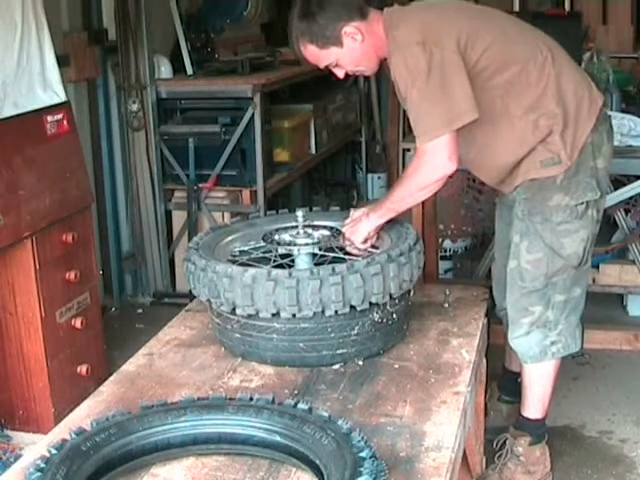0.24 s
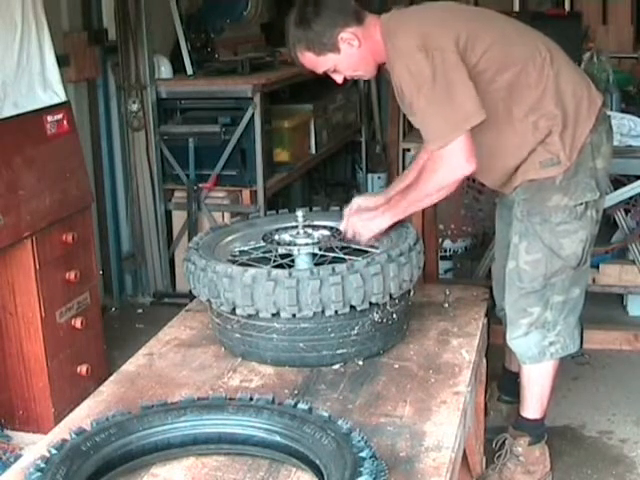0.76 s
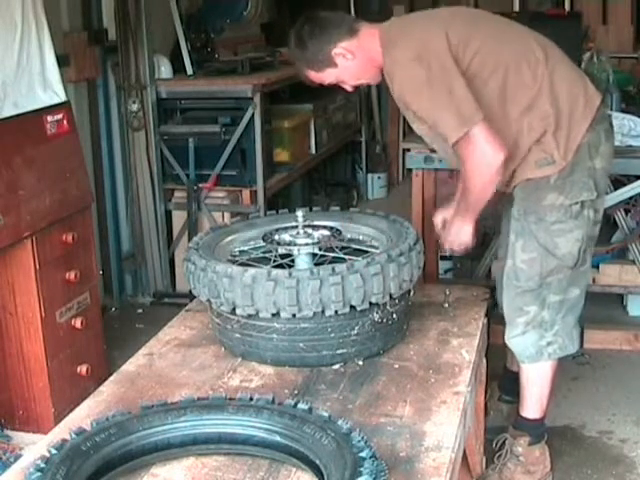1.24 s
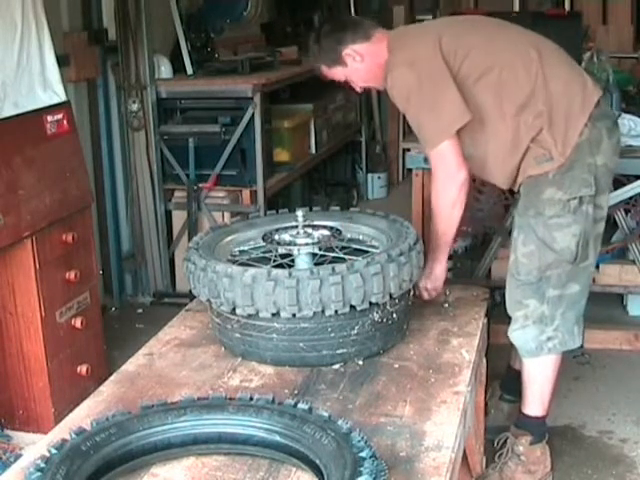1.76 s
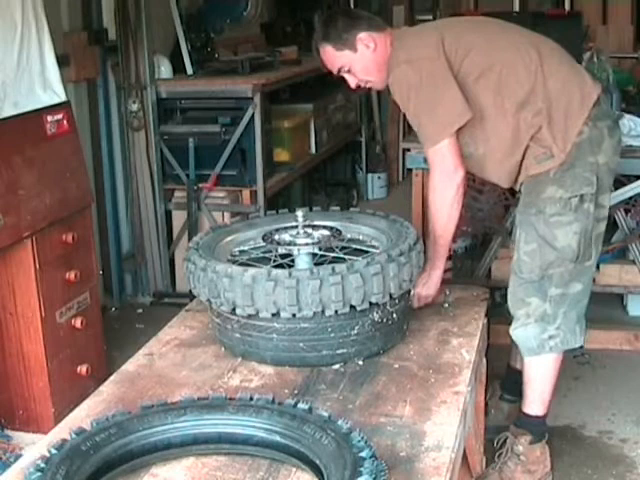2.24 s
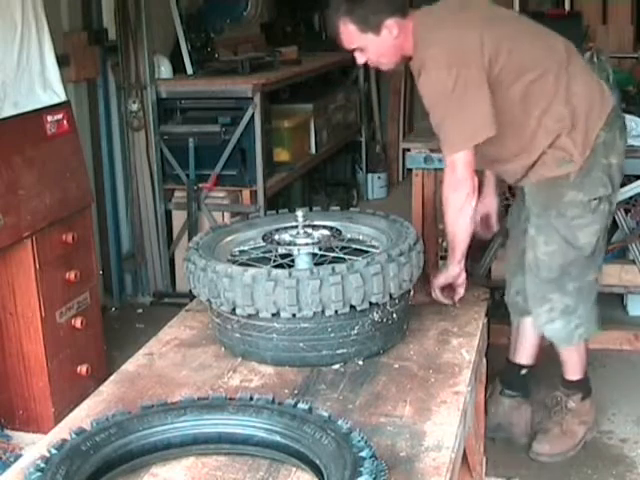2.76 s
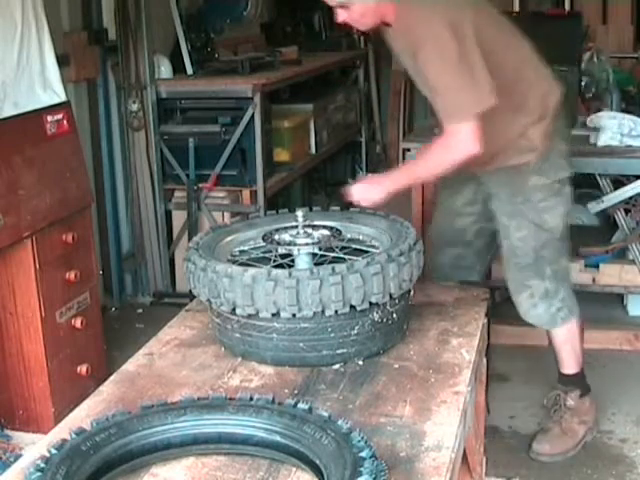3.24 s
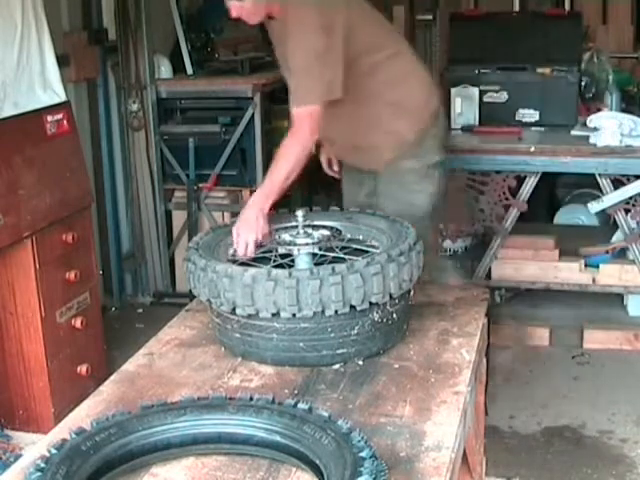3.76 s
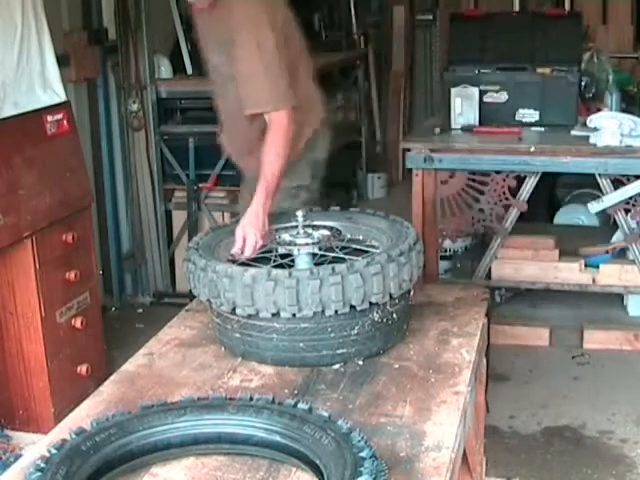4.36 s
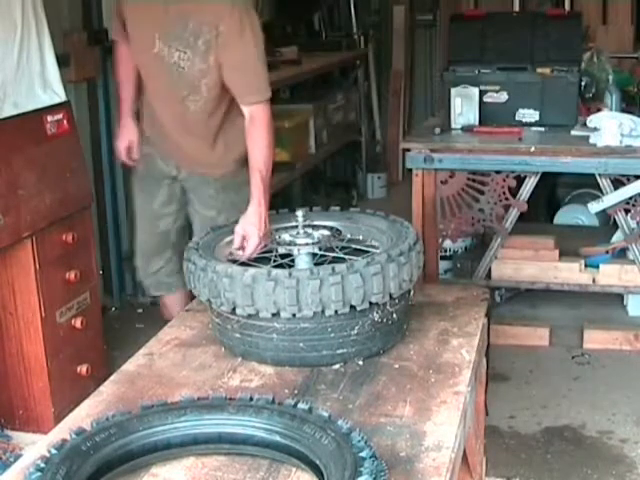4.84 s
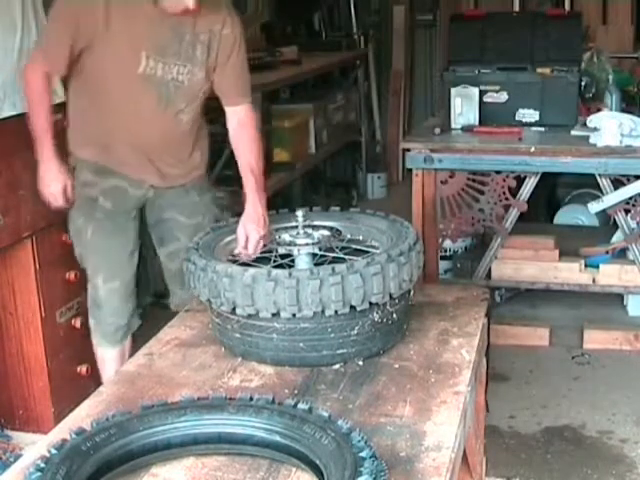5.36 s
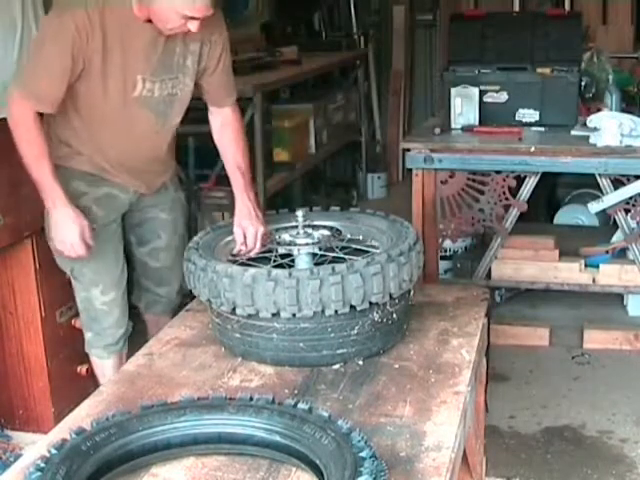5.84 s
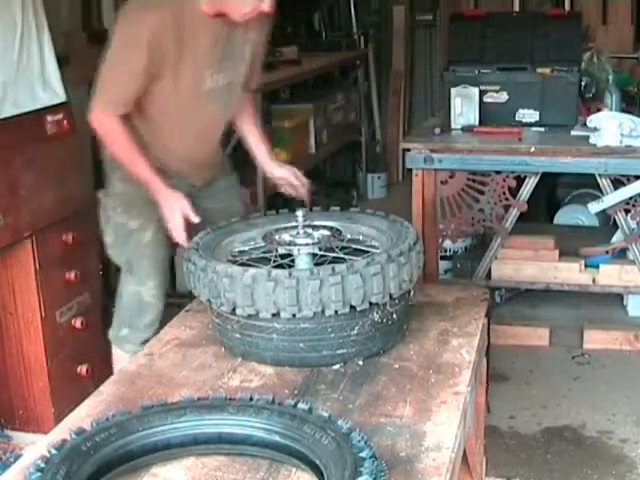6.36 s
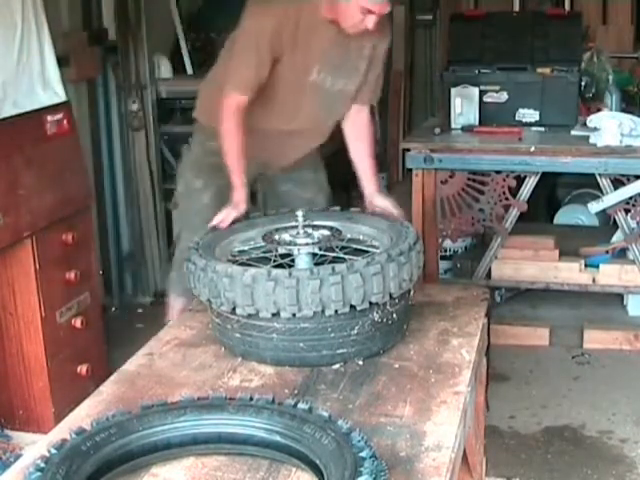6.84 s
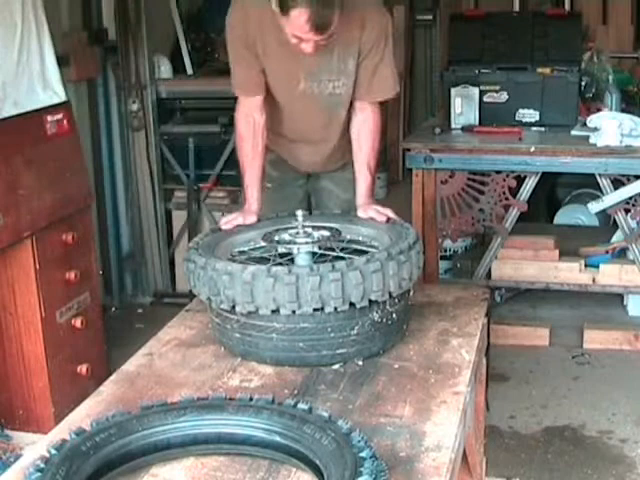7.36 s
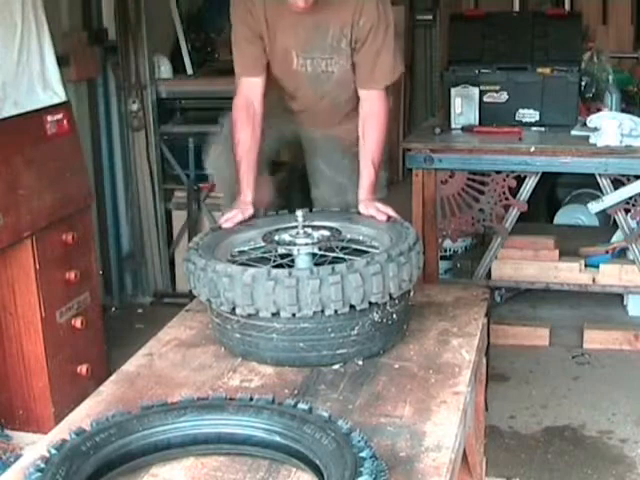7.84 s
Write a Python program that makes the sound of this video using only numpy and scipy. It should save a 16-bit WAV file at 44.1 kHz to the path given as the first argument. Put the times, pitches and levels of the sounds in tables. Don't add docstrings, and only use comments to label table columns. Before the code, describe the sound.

In an open workshop, a loosened tyre valve spits, then bursts into a strong bright hiss that slowly fades over several seconds. Early low wind thumps buffet the close stereo microphone. A small tool knocks on the wooden bench and boots scuff lightly. Near the end a steel tool clatters down loudly in rapid bounces, followed by a couple of dull thuds. Faint drive whine and ticking run underneath.

```python
import sys
import numpy as np
from scipy import signal
from scipy.fft import rfft, irfft, next_fast_len
from scipy.io import wavfile
from scipy.ndimage import uniform_filter1d

SR = 44100
rng = np.random.default_rng(int(sys.argv[2]) if len(sys.argv) > 2 else 0)


def linear_from_db(decibels):
    return 10 ** (np.asarray(decibels, float) / 20)


def materialize(psi):
    bounded = np.clip(np.atleast_2d(psi).T, -1, 1)
    quanta = np.round(bounded * 32767).astype(np.int16)
    wavfile.write(sys.argv[1], SR, quanta)


N = 356813


def evened(x):
    return x / np.sqrt(np.mean(x ** 2) + 1e-20)


def unit(shape):
    return shape / np.sqrt((shape ** 2).sum(0))


def read(points, hz):
    f, value = np.transpose(points)
    return np.interp(np.log(hz + 1), np.log(f + 1), value)


def add(mix, s, sound):
    part = mix[round(s * SR):][:len(sound)]
    part += sound[:len(part)]


def grid(size):
    return np.arange(N * 4 // size + 5) * size / 4 / SR, np.fft.rfftfreq(size, 1 / SR)[:, None]


def sine(hz, t):
    return np.sin(2 * np.pi * hz * t)


def onset(t, rise_s):
    return 1 - np.exp(-t / rise_s)


def decay(t, t60):
    return linear_from_db(-60 * t / t60)


def resonance(hz, centre_hz, width_hz):
    return 1 / (1 + ((hz - centre_hz) / width_hz) ** 2)


def swell(t, events, rise_db_per_s, fall_db_per_s):
    s, hold, db = np.transpose(events)[:, :, None]
    under_db = np.maximum(rise_db_per_s * (s - t), 0) + np.maximum(fall_db_per_s * (t - s - hold), 0)
    return np.sqrt((linear_from_db(db - under_db) ** 2).sum(0))


def noise(gain, same, patchy_db, flicker_db):
    bins, frames = gain.shape[-2:]
    a, b, c, d, patches = rng.standard_normal((frames, bins, 5), dtype=np.float32).T
    patches = evened(uniform_filter1d(uniform_filter1d(patches, size=9, axis=0), size=9, axis=1))
    flicker = evened(uniform_filter1d(rng.standard_normal(frames), size=4))
    same, left = np.clip(same, -1, 1), a + 1j * b
    right = same * left + np.sqrt(1 - same ** 2) * (c + 1j * d)
    z = np.array([left, right])
    z *= gain * linear_from_db(patchy_db * patches + flicker_db * flicker)
    ports = signal.istft(z, nperseg=2 * bins - 2, noverlap=3 * (bins - 1) // 2)[1]
    return ports[:, :N] / np.sqrt(3)


def coloured(points, length):
    spectrum = rfft(rng.standard_normal(length))
    return evened(irfft(spectrum * linear_from_db(read(points, np.fft.rfftfreq(length, 1 / SR))), length))


def ring(modes, tilt_db):
    hz, db, t60 = np.transpose(modes)[:, :, None]
    t, luck = np.arange(SR // 5) / SR, rng.standard_normal((len(modes), 3))
    spread_db, detune, slip = 2.2, .02, .4
    turns = hz * (1 + detune * luck[:, 2:]) * t
    level = linear_from_db(db + tilt_db + spread_db * luck[:, :1]) * decay(t, t60)
    tones = level * np.sin(2 * np.pi * turns + slip * luck[:, 1:2])
    return tones.sum(0) * onset(t, .0016) * np.minimum(20 * (t[-1] - t), 1)


def slow_gain_db(t, creep, back):
    turn_s, back_s = 7.9, 7.95
    rise_db = .85 * np.minimum(t, turn_s) + .5 * (t > turn_s)
    return creep * rise_db + back * 3.5 * np.maximum(t - back_s, 0)


def shop():
    # f/Hz, level/dB per Hz
    murmur = [(40, -51), (88, -7.5), (150, -7), (627, -8.5), (772, -8), (1380, -14.5), (3550, -22.5),
              (3750, -26), (5330, -17.5), (5900, -23.5), (8760, -23.5), (11200, -44), (13500, -60)]
    # f/Hz, likeness (0-1)
    likeness = [(200, 0.47), (1000, 0.56), (3000, 0.32), (4500, 0.42), (8000, 0.6)]
    # f/Hz, level/dB rms
    gears = [(5171, -64), (5238, -70), (5265, -55.5), (5394, -55.5), (5500, -71)]
    t, hz = grid(size=1024)
    gain = linear_from_db(-50.5 + slow_gain_db(t, .53, .27) + 9) * unit(linear_from_db(read(murmur, hz)))
    air = noise(gain, read(likeness, hz), patchy_db=2, flicker_db=.2)
    t = np.arange(N) / SR
    wow = .3 * evened(uniform_filter1d(rng.standard_normal(N), size=6000))
    whine = sum(linear_from_db(db + 3) * np.sin(2 * np.pi * (f * t + rng.random()) + wow) for f, db in gears)
    beat_hz, beat_db, beat_from_s, beat_rise_s = 5367, -62.5, 7, .9
    beat_db = beat_db + 11.5 * np.clip((t - beat_from_s) / beat_rise_s, 0, 1)
    beat = linear_from_db(beat_db + 2) * np.sin(2 * np.pi * beat_hz * t + wow)
    return air + linear_from_db(-2.5 + slow_gain_db(t, .24, 2.9)) * (whine + beat)


def wind():
    # t/s, hold/s, common level/dB, opposite level/dB
    gusts = np.array([(0.373, 0.02, -47, -33), (0.51, 0.014, -48, -33), (0.58, .01, -43, -48),
                      (0.641, 0.01, -36.5, -32), (0.703, 0.022, -45, -45), (0.778, 0.041, -34, -34),
                      (0.853, 0.022, -35, -31), (0.915, 0.022, -37, -38), (1.002, 0.017, -39, -39),
                      (1.07, .015, -49, -43), (1.14, 0.014, -45, -38), (1.195, 0.017, -40, -36),
                      (1.296, 0.013, -37.5, -41), (1.36, 0.0093, -50, -51), (1.474, 0.035, -41.5, -40),
                      (1.547, .015, -46, -41), (1.61, 0.02, -37.5, -36), (1.673, .02, -40.5, -36),
                      (1.76, 0.027, -43, -44), (1.86, 0.025, -53, -56), (1.98, 0.22, -48, -52.5),
                      (2.3, 0.22, -48, -52), (2.474, 0.033, -49, -44), (2.62, 0.15, -49.5, -68),
                      (2.97, 0.6, -60, -76), (4.047, 0.28, -70, -53), (4.45, 0.22, -70, -53),
                      (4.893, .05, -70.5, -46), (5.25, .1, -75.5, -48), (6.0, .07, -78, -53),
                      (6.13, .04, -80, -40), (6.38, .07, -70, -48), (6.665, .05, -70, -43)])
    # t/s, f/Hz, level/dB
    puffs = [(.39, 120, -44), (.525, 55, -41), (.645, 170, -32.5), (0.798, 200, -34), (.865, 116, -37),
             (1.031, 250, -43), (1.07, 95, -40), (1.145, 125, -35), (1.19, 160, -40), (1.22, 110, -38),
             (1.3, 190, -33), (1.319, 108.3, -41), (1.469, 120, -38), (1.509, 80, -35), (1.56, 160, -36),
             (1.63, 150, -38), (1.69, 100, -41)]
    # t/s, hold/s, level/dB
    passing = [
        (4.617, 0.087, -47),
        (5.1, 0.04, -41.5),
        (5.35, 0.054, -43),
        (5.62, 0.1, -51),
        (5.777, 0.36, -41.5),
        (6.3, .05, -48),
        (6.63, 0.027, -43),
        (7.445, 0.053, -42.5),
        (7.7, 0.22, -48.5),
    ]
    # f/Hz, level/dB per Hz
    common_colour = [(12, -57), (35, -16), (124, 4.5), (282, -6.5), (354, -12), (386, -17), (600, -43),
                     (780, -53), (1320, -120)]
    apart_colour = [(12, -46), (20, -17), (64, -7), (87, 0.5), (344, -13.5), (392, -18), (600, -38),
                    (780, -71), (1320, -120)]
    traffic_colour = [(18, -46), (30, -49), (81, -8.5), (212, -5), (368, -13.5), (461, -20), (600, -25),
                      (780, -47), (1320, -120)]
    t, hz = grid(size=1024)
    common, apart = (swell(t, gusts[:, [0, 1, k]], 448, 346) for k in (2, 3))
    traffic_from_s, breeze_from_s = 4.3, 4.6
    calm = linear_from_db(-59.5) * (t < traffic_from_s) * (t > gusts[0, 0])
    common = np.hypot(common, calm) * linear_from_db(3.5) * unit(linear_from_db(read(common_colour, hz)))
    traffic = np.hypot(swell(t, passing, 87, 60), linear_from_db(-54) * (t > traffic_from_s))
    rumble = traffic * linear_from_db(3.5) * unit(linear_from_db(read(traffic_colour, hz)))
    breeze = linear_from_db(np.minimum(-51 + 5 * (t - breeze_from_s), -42)) * (t > breeze_from_s)
    apart = np.hypot(apart, np.hypot(breeze, linear_from_db(-76)))
    apart = apart * linear_from_db(2.5) * unit(linear_from_db(read(apart_colour, hz)))
    mid, side = noise(np.array([np.hypot(common, rumble), apart]), 0, patchy_db=2.5, flicker_db=1.4)
    for s, puff_hz, db in puffs:
        turns = np.arange(-3 * SR // 100, 3 * SR // 100) / SR * puff_hz
        shape = np.hanning(len(turns)) * np.exp(-(turns / 1.06) ** 2)
        add(mid, s - .03, linear_from_db(db + 1.5) * shape * np.sin(2 * np.pi * (turns + rng.random())))
    return np.array([mid + side, mid - side])


def ticks():
    out, t = np.zeros(N), np.arange(400) / SR
    tick = sine(1200, t) * decay(t, .014) * onset(t, .00099)
    first_s, round_s, step_s = .172, .18, .04
    for start in np.arange(first_s, N / SR, round_s):
        for step in range(4):
            db = -41 + 9 - 1.6 * (step > 0) + 1.7 * rng.standard_normal()
            add(out, start + step * step_s, linear_from_db(db) * tick)
    body = linear_from_db(-65) * sine(6611, np.arange(N) / SR)
    out = out + body
    return np.array([out, -out]) + linear_from_db(-4) * body


def scuffs():
    # t/s, peak level/dB, ring f/Hz, grit relative level/dB, t60/s
    contacts = [(2.965, -31, 1470, 0, .15), (2.982, -27.5, 620, 5, 0.17), (2.997, -31, 1400, 2, .12),
                (3.051, -26.5, 1445, -0.5, 0.13), (3.402, -41, 2160, 6, 0.11),
                (4.048, -25, 1680, -8, 0.093), (4.091, -34, 1380, -10, 0.15), (5.739, -33, 298, -11, 0.075),
                (6.596, -40, 371, 1, 0.077), (6.638, -32, 300, -5, 0.48), (6.665, -13, 703, -10, 0.062),
                (6.774, -39, 480, -11, 0.15), (7.415, -26.5, 700, -22, 0.16),
                (7.449, -27.5, 1470, -7, 0.23), (7.482, -20, 745, -30, 0.12),
                (7.486, -16.5, 690, -20, 0.068)]
    # t/s, f/Hz, level/dB, t60/s
    taps = [(6.666, 2620, -30, .05), (7.097, 510, -21, .26), (7.14, 1590, -19, .22),
            (7.125, 3520, -36, .17), (7.13, 3680, -36, .18), (7.14, 3860, -36, .17), (7.15, 4050, -39, .15),
            (6.977, 3700, -30, .22), (6.835, 248, -21, .07), (6.838, 1120, -15, .06),
            (6.866, 1066, -17, .05), (6.877, 410, -21, .06), (7.008, 3680, -30, .12),
            (7.012, 1500, -22, .1), (6.929, 3750, -18, .04), (6.887, 3700, -20, .04),
            (7.13, 3310, -33, .18), (7.483, 2080, -21, .024), (7.487, 1100, -21, .03),
            (7.487, 1600, -23, .03), (7.485, 330, -27, .04)]
    thud_colour = [(45, -50), (100, -33), (300, -2), (1500, -5), (3000, -12.5), (5000, -24.5)]
    grit_colour = [(2500, -35), (4000, -4), (9000, 2), (13000, -20)]
    out, t = np.zeros(N), np.arange(SR // 4) / SR
    for s, db, hz, grit_db, t60 in contacts:
        thud = coloured(thud_colour, len(t))
        grit = coloured(grit_colour, len(t))
        tone = 1.65 * sine(hz, t) * decay(t, .037)
        rub = (thud + linear_from_db(grit_db) * grit) * decay(t, max(t60, .02))
        add(out, s, linear_from_db(db - 7) * onset(t, .0036) * (tone + rub))
    for s, hz, db, t60 in taps:
        add(out, s, ring([(hz, db, t60)], 0))
    return out


def knocks():
    # t/s, peak level/dB, sharpness relative level/dB
    contacts = [
        (2.272, -20.5, 3),
        (2.65, -25.5, 0),
        (2.704, -32, -6),
        (2.744, -48, 8),
        (2.75, -29, -3.5),
        (2.83, -29, -8),
        (2.882, -44, 6),
    ]
    # f/Hz, level/dB, t60/s
    bench = [(516, -3, .15), (550, -9, .07), (450, -18, .05), (600, -9, .05), (660, -8, .07),
             (950, -4, .045), (1080, -2, .045), (1220, -3, .045), (1380, -6, .05), (1500, -4, .06),
             (1750, -10, .09)]
    out, hz = np.zeros(N), np.transpose(bench)[0][:, None]
    for s, db, sharp_db in contacts:
        add(out, s, linear_from_db(db - 1) * ring(bench, sharp_db * (hz > 800)))
    return out


def clatter():
    # t/s, peak level/dB, hollow ring f/Hz, bright ring f/Hz, bright over hollow level/dB
    bounces = [(6.8318, -2, 750, 2300, -6), (6.8338, 4.5, 1055, 2300, -6), (6.8344, 5.5, 620, 1486, -1.5),
               (6.857, 4, 1060, 2820, 14), (6.8598, 1.5, 786, 1930, 10), (6.868, 0.5, 597, 1510, 0),
               (6.886, 2.5, 1970, 2956, 10), (6.899, -13, 940, 1640, 11), (6.9275, 1.5, 1040, 2290, 4),
               (6.931, 3, 696, 2370, 0), (6.948, -3.5, 840, 2280, 6), (6.971, 1.5, 650, 2300, -7),
               (6.995, -12, 525, 1500, 2), (7.034, -7, 1060, 2420, 5), (7.0375, -2, 640, 1500, -3),
               (7.047, -5.5, 1500, 2360, 7), (7.055, -0.5, 1000, 1475, 6), (7.076, -7, 790, 1570, 6),
               (7.0954, 1, 540, 1520, 6), (7.105, -5.5, 527, 2260, -1.5), (7.111, -9.5, 543, 1500, -12),
               (7.136, -4.5, 996, 1550, -6)]
    # f/Hz, level/dB, t60/s
    steel = [(286, -5, 0.1), (508, -3, 0.35), (604, -7, 0.068), (744, -13.5, 0.21), (996, -4, 0.24),
             (1125, 0, 0.22), (1460, -2, 0.082), (1620, -4, 0.23), (1680, -6, 0.46), (1760, -11, .12),
             (2020, -18, 0.16), (2330, -4, 0.11), (2500, -2, 0.13), (3250, 0, 0.075), (3450, -11, 0.32),
             (3520, -14, 0.32), (3690, -16, 0.18), (4200, -30, 0.099), (4070, -15, 0.21), (3810, -26, .2),
             (5000, -24, .3), (6360, -26.5, 0.9), (7350, -42, .5)]
    # t/s, level/dB, t60/s
    sprays = [(6.835, -26, .03), (6.861, -24, .025), (6.888, -21, 0.037), (6.929, -16, 0.035),
              (6.934, -21, 0.042), (6.944, -28, .15), (6.974, -31.5, 0.27), (7.036, -27, 0.043),
              (7.055, -27.5, .06), (7.0965, -22.5, .04), (7.107, -32, .08)]
    # f/Hz, level/dB per Hz
    crack_colour = [(88, -48), (150, -17.5), (270, -8.5), (382, -12.5), (638, -4.5), (1190, -9),
                    (2300, -12.5), (3700, -25), (6090, -39.5), (7180, -34.5), (12000, -52.5), (15600, -103),
                    (22000, -120)]
    spray_colour = [(2600, -28), (3500, 1.5), (5300, -3), (6500, -11), (8500, -27), (12000, -52)]
    buzz_colour = [(2900, -30), (3250, -5), (3700, 3), (4200, -4), (4800, -25)]
    out, hz, t = np.zeros(N), np.transpose(steel)[0][:, None], np.arange(SR // 3) / SR
    for s, db, hollow_hz, bright_hz, tilt_db in bounces:
        hollow_db, bright_db = -6 - max(tilt_db, 0), -6 + min(tilt_db, 0)
        tilted = [(f, d + .88 * tilt_db * (1500 < f < 3300)) for f, d in crack_colour]
        crack = coloured(tilted, len(t)) * onset(t, .0018)
        crack = crack * (decay(t, .032) + .096 * decay(t, .45))
        faces = linear_from_db(hollow_db) * sine(hollow_hz, t) + linear_from_db(bright_db) * sine(bright_hz, t)
        faces = faces * decay(t, .028) * onset(t, .0017)
        body = ring(steel, .63 * np.where(hz > 1300, bright_db, hollow_db))
        add(out, s, linear_from_db(db) * (linear_from_db(-6.5) * crack + linear_from_db(1) * faces))
        add(out, s, linear_from_db(db - 22) * body)
    u = t[:6000]
    for s, db, t60 in sprays:
        add(out, s, linear_from_db(db) * decay(u, max(t60, .01)) * onset(u, .0007) * coloured(spray_colour, len(u)))
    start_s, hold_s, buzz_db = 7.11, .085, -39
    lumps_db = 3.4 * evened(uniform_filter1d(rng.standard_normal(len(t)), size=200))
    buzz = coloured(buzz_colour, len(t)) * linear_from_db(lumps_db)
    add(out, start_s, swell(t, [(.02, hold_s, buzz_db)], 600, 400) * buzz)
    return out


def walls(x):
    # f/Hz, t60/s
    dying = [(200, 0.56), (1000, 0.24), (4000, 0.41), (10000, 0.19)]
    taps = np.zeros((2, SR // 2))
    at = np.arange(200, SR // 2 - 20, 20) + rng.integers(0, 20, (2, (SR // 2 - 201) // 20))
    np.put_along_axis(taps, at, rng.choice([-1., 1.], at.shape), 1)
    hz, t, z = signal.stft(taps, SR, nperseg=256)
    tail = signal.istft(z * decay(t, read(dying, hz)[:, None]), SR, nperseg=256)[1]
    shared = signal.lfilter(*signal.butter(1, 2200, fs=SR), tail[1] - tail[0])
    tail = tail + np.array([[.45], [-.45]]) * shared
    return signal.fftconvolve(x[None], tail / np.linalg.norm(tail[0]), axes=1)[:, :N]


def whistles():
    # t/s, hold/s, level/dB
    shank = [
        (6.995, 0.012, -27.5),
        (7.14, .03, -41.5),
    ]
    # t/s, length/s, f/Hz, level/dB
    tones = [
        (.4, .04, 8100, -34),
        (.565, 0.044, 7760, -38),
        (.625, 0.034, 7880, -39),
        (.6, .06, 11025, -37),
        (.605, .04, 10831, -40),
        (4.522, 0.051, 9100, -48.5),
        (5.18, 0.052, 8860, -47),
    ]
    t = np.arange(N) / SR
    out = swell(t, shank, 380, 212) * sine(6988, t)
    for s, length_s, hz, db in tones:
        u = t[t < length_s]
        add(out, s, linear_from_db(db + 11.5) * sine(hz, u) * signal.windows.tukey(len(u), .4))
    return out


def jet():
    # t/s, jet level/dB, finger roar relative level/dB, pinch of the gap round the core (0-1)
    course = [(0.0, -38.5, -1, .6), (0.102, -44.5, 1, 1), (0.142, -27.5, -13.5, 0.5), (.172, -33, -7, 0.6),
              (.225, -28.5, -12, .4), (.29, -36, -1, 0.8), (0.34, -33, -7.5, 0.9), (0.358, -22, -3.5, 0.3),
              (.385, -20.5, -8, 0.5), (0.414, -15.5, -7.5, 0.3), (0.51, -26, -6.5, 0.74),
              (0.646, -20.5, -14.5, 1), (.69, -21, -8.5, 0.8), (0.746, -21.5, 0, 0.4), (.8, -25.5, 1, 1),
              (0.86, -28, 2, 1), (0.92, -28, -14, 0.75), (1.0, -27.5, -16, 0.75),
              (1.11, -25.5, -12.5, 0.82), (1.71, -25, -11.5, 0.78), (3.1, -30, -10, 0.4),
              (3.89, -35.5, -7.5, 0.05), (5.43, -43.5, -6, 0), (6.05, -49.5, -8, .4),
              (6.55, -52.5, -34, 0.8)]
    # f/Hz, level/dB per Hz
    jet_colour = [(600, -50), (1500, -13.5), (3000, -7.5), (6000, -3.5), (9000, -0.5), (11000, -5),
                  (13500, -60)]
    roar_colour = [(180, -41), (300, -12), (358, -24.5), (950, -9), (1300, -4), (1590, -1), (1710, -5.5),
                   (2500, -2.5), (3100, -5.5), (3700, -8), (6000, -4.5), (7800, -14), (13200, -120)]
    # f/Hz, likeness (0-1)
    likeness = [(300, 0.63), (1000, 0.98), (2100, .89), (3400, 0.74), (4800, 0.84), (6200, .72),
                (8500, .88), (12000, .8)]
    # f/Hz, width/Hz, level/dB
    rim = [(1760, 60, 4), (2080, 30, 3), (2630, 25, 3), (2950, 100, 5), (3220, 25, 4), (3800, 40, 4),
           (4450, 40, 3), (4810, 25, 3), (5180, 50, 3)]
    t, hz = grid(size=512)
    s, *columns = np.transpose(course)
    jet_db, roar_db, pinch = (np.interp(t, s, c) for c in columns)
    jet_db = jet_db - 2.5 * np.maximum(t - s[-1], 0)
    core_out_s, core_slide_s, loose_until_s = 1, .46, .47
    core_in = np.clip((core_out_s - t) / core_slide_s + .5, 0, 1)
    loose = np.clip((loose_until_s - t) * 10 + .5, 0, 1)
    knee_db, span_db, core_damps_db = -24.5, 12, 44
    stem_db = -10.5 + 15.8 * np.tanh((knee_db - jet_db) / span_db) - core_damps_db * core_in
    over_hz = 7385 + 480 * pinch + 233 * np.minimum(t, s[-1])
    over_wide_hz = 1150 * (1 - .32 * loose)
    fizz_db = -25.5 + 18.5 * pinch
    base = linear_from_db(6 - loose) * unit(linear_from_db(read(jet_colour, hz)))
    overtone = linear_from_db(7) * unit(resonance(hz, over_hz, over_wide_hz))
    stem = linear_from_db(stem_db) * unit(resonance(hz, 4476, 467))
    roar = linear_from_db(roar_db + 7) * unit(linear_from_db(read(roar_colour, hz)))
    fizz = linear_from_db(fizz_db + 8.5) * unit(np.exp(-((hz - 11300) / 1600) ** 2))
    power = base ** 2 + overtone ** 2 + stem ** 2 + roar ** 2 + fizz ** 2
    gain = linear_from_db(jet_db - 2) * np.sqrt(power)
    air = noise(gain, read(likeness, hz), patchy_db=.78, flicker_db=-.35)
    length = next_fast_len(N)
    hz = np.fft.rfftfreq(length, 1 / SR)
    rim_db = sum(db * resonance(hz, f, width) for f, width, db in rim)
    ripple_db = 1.8 * evened(uniform_filter1d(rng.standard_normal(len(hz)), size=250))
    spectrum = rfft(air, length) * linear_from_db(ripple_db)
    held = irfft(spectrum, length)[:, :N]
    free = irfft(spectrum * linear_from_db(rim_db), length)[:, :N]
    hand_off_s = .9
    hand = np.interp(np.arange(N) / SR, [hand_off_s - .05, hand_off_s + .041], [1, 0])
    return free + hand * (held - free)


def scene():
    # f/Hz, phase/radians
    port_turn = [(2200, 0), (3400, .6), (5500, 1.1), (8100, 1.5), (9300, 1.9), (10300, 2.5), (11800, 3)]
    high_pass = signal.butter(3, 130, "high", fs=SR, output="sos")
    hits = signal.sosfilt(high_pass, knocks() + scuffs() + clatter())
    panned = hits * linear_from_db(np.array([[-.2], [.2]]))
    left, right = jet() + shop() + whistles() + panned + linear_from_db(-6) * walls(hits)
    length = next_fast_len(N)
    turn = np.exp(-1j * read(port_turn, np.fft.rfftfreq(length, 1 / SR)))
    left = irfft(rfft(left, length) * turn, length)[:N]
    return np.array([left, right]) + wind() + ticks()


def top_cut(x):
    return signal.sosfilt(signal.butter(12, 13850, fs=SR, output="sos"), x)


def record(dry):
    power_db = 10 * np.log10(abs(uniform_filter1d((dry ** 2).mean(0), size=400)) + 1e-12)
    fall = np.arange(N) * 28 / SR
    over_db = np.maximum(np.maximum.accumulate(power_db + fall) - fall + 10, 0)
    ducked = dry / linear_from_db(.5 * uniform_filter1d(over_db, size=200))
    return top_cut(np.clip(ducked, -.97, .97))


dry = scene()
out = record(dry)
materialize(out)
```